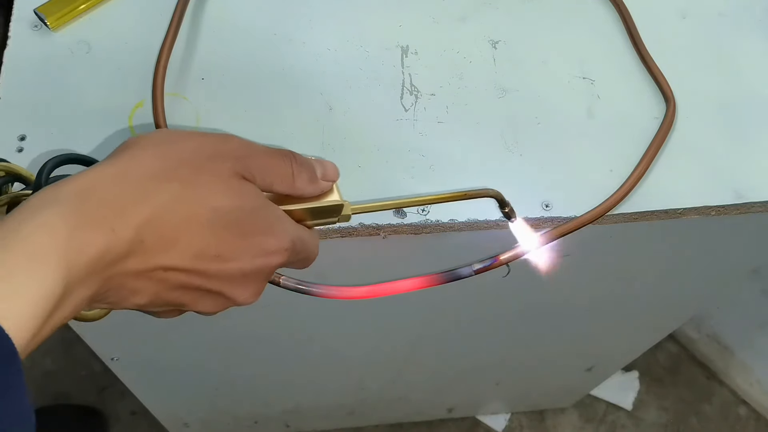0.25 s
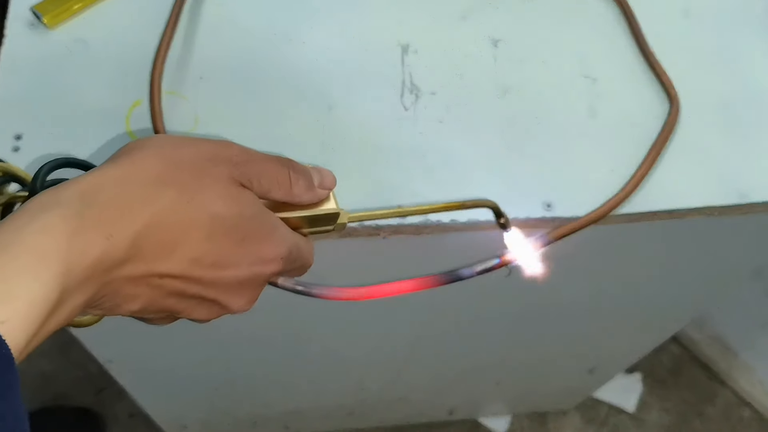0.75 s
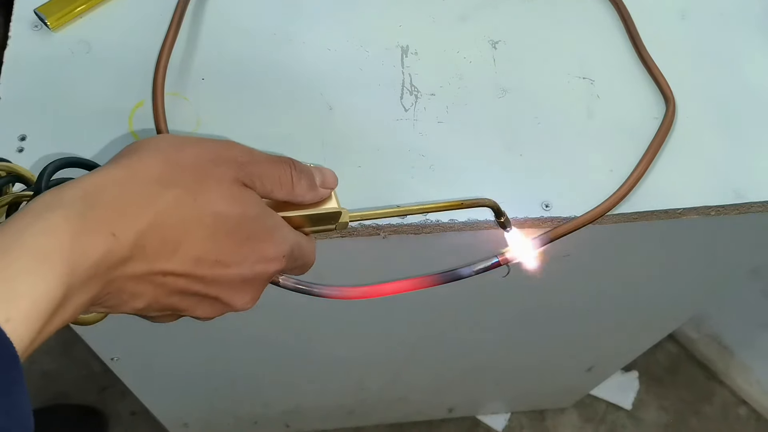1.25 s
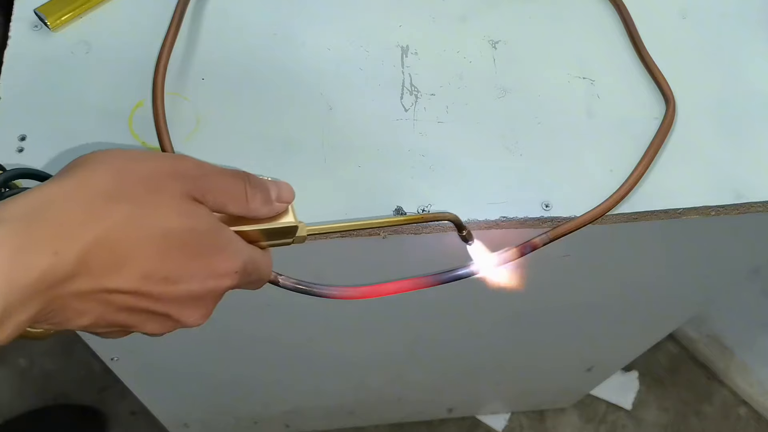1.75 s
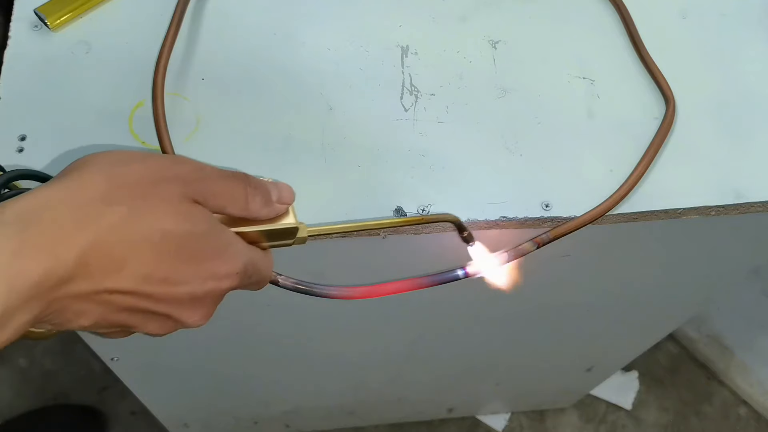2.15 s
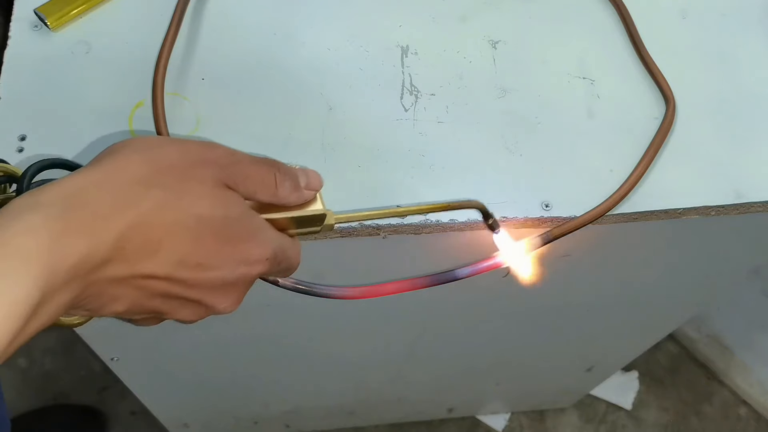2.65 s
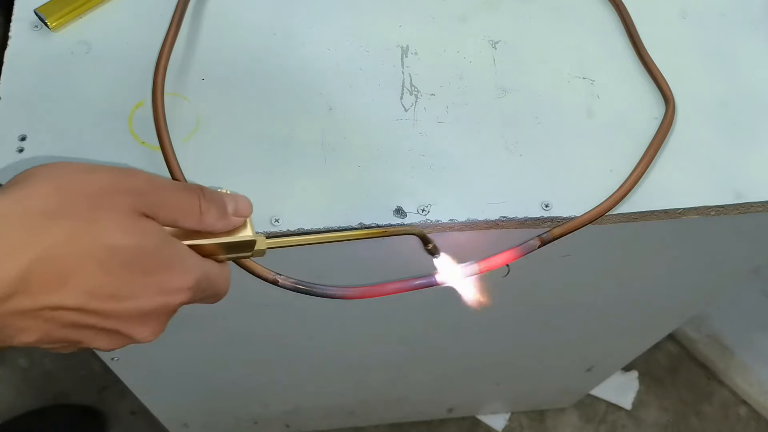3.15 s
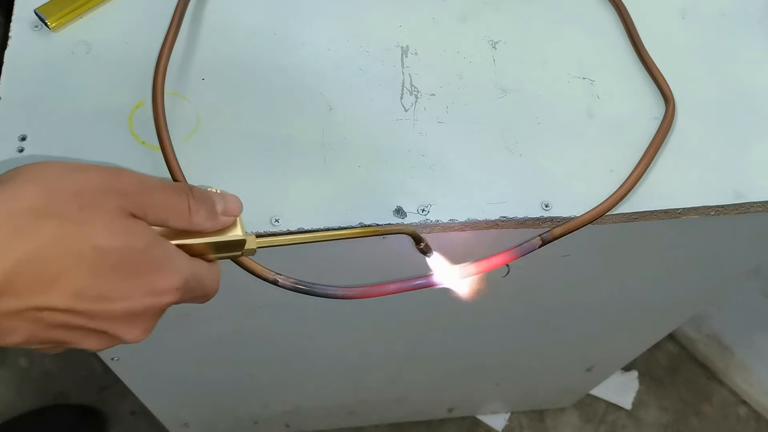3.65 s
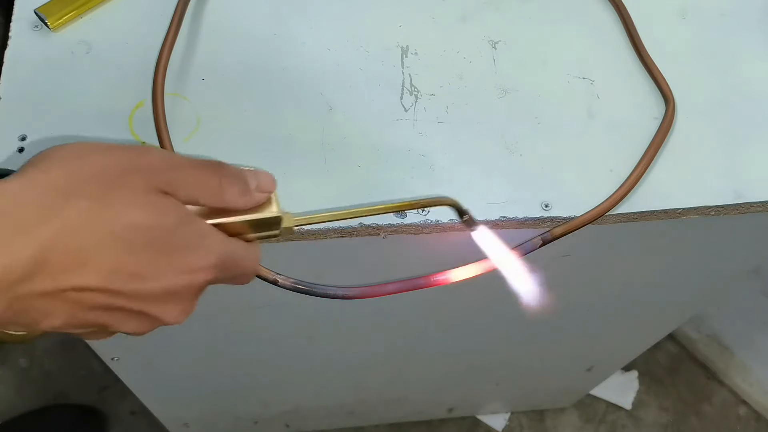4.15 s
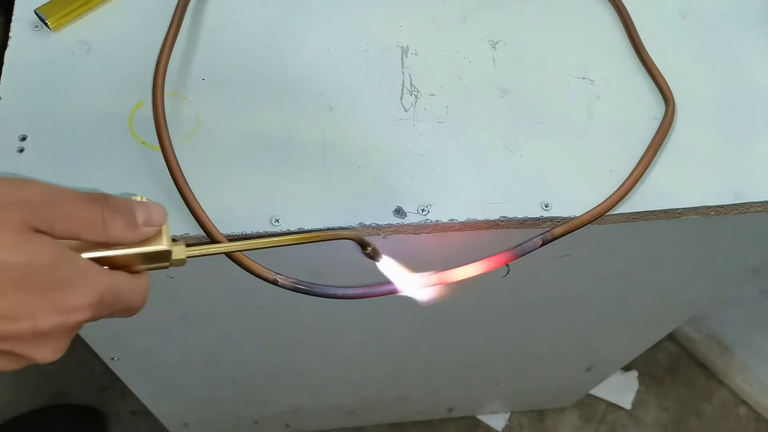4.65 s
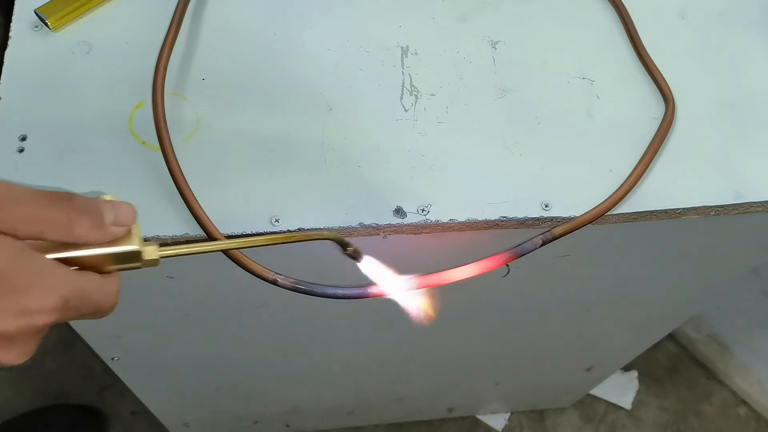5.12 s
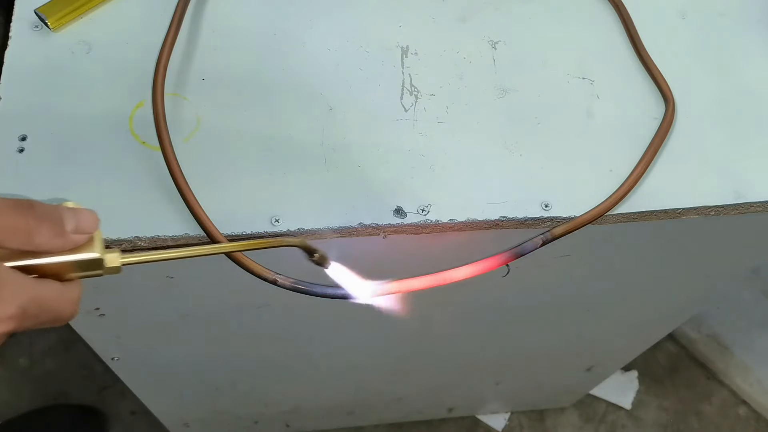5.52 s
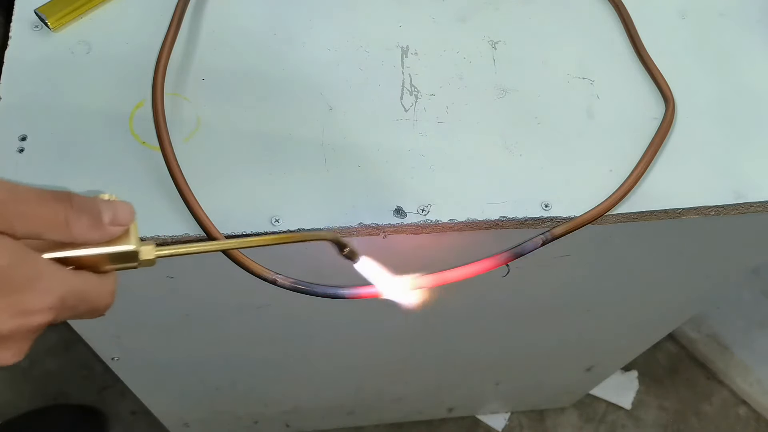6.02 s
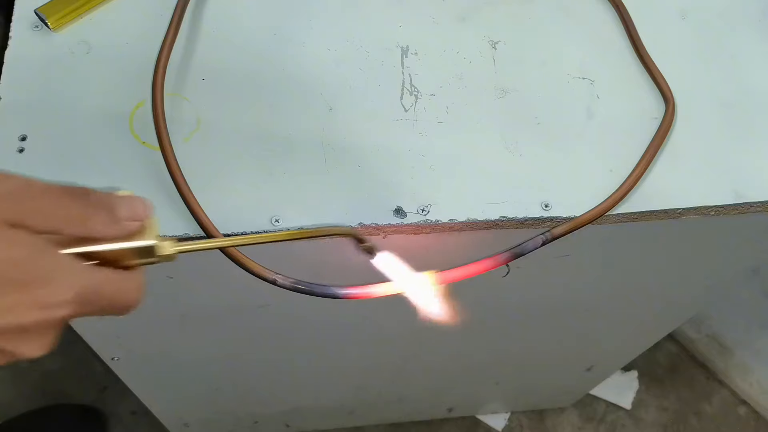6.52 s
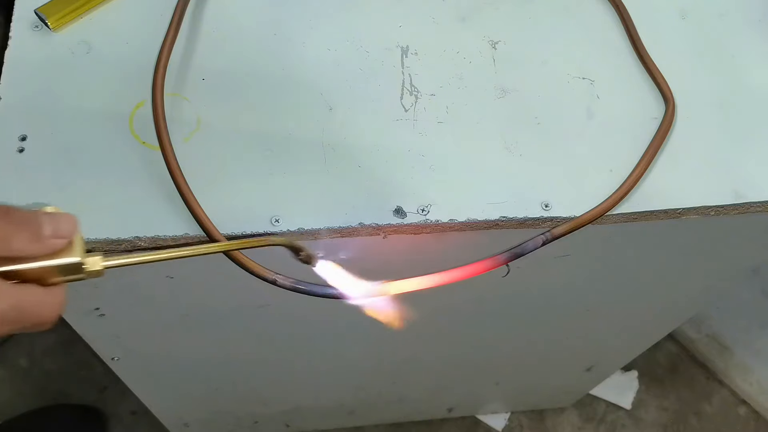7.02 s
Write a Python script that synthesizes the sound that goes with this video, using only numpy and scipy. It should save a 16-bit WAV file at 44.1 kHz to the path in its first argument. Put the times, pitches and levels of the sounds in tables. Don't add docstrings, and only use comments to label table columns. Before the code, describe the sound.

A hand-held gas torch hisses steadily and brightly against a metal pipe in a small hard room, with soft low flame surges.

```python
import sys
import numpy as np
from scipy import signal
from scipy.fft import rfft, irfft
from scipy.io import wavfile
from scipy.ndimage import uniform_filter1d

SR = 44100
rng = np.random.default_rng(int(sys.argv[2]) if len(sys.argv) > 2 else 0)


def unload_wav(signal):
    wavfile.write(
        sys.argv[1],
        SR,
        np.round(np.clip(np.atleast_2d(signal).T, -1, 1) * 32767).astype(np.int16),
    )


def volts_from_db(level):
    exponent = np.asarray(level, float) / 20
    return 10 ** exponent


N = 321048
SIZE, HOP = 1024, 256

# freq_hz, density_db
HISS_SPECTRUM = [(1400, -21), (2400, -16.5), (3050, -8), (3400, -2), (4200, -2), (5000, -0.5), (6300, -0.5),
                 (7600, -0.5), (8200, -2.5), (8700, -8.5), (10000, -21.5), (13000, -20)]
# freq_hz, density_db
SPLASH_SPECTRUM = [(300, -37), (600, -15.5), (1000, -13), (1500, -11), (2000, -2.5), (2600, 1), (3200, 1.5),
                   (3600, -17.5)]
# freq_hz, density_db
FIZZ_SPECTRUM = [(7600, -19), (8800, 0), (10000, 2.5), (11500, 3.5), (13000, 0), (14500, -0.5), (15500, 1),
                 (17000, -50.5)]
# freq_hz, density_db
ROAR_SPECTRUM = [(20, -20), (48, -9.5), (95, -20), (120, -8), (210, 0), (330, -3), (420, -4.5), (560, -8.5),
                 (800, -7.5), (1300, -12.5), (1800, -18)]
# freq_hz, density_db
BURN_SPECTRUM = [(15, -26), (40, -4.5), (95, -10), (130, -5.5), (210, -0.5), (400, -0.5), (520, -11.5),
                 (800, -2), (1200, -10.5), (2000, -38), (4000, -90)]
# hiss_db, splash_db, fizz_db, roar_db
LAYER_TRIM_DB = [0.96, 1.63, 2, 0.39]
# time_s, jet_level_db, turn_to_microphone_db, tip_db_per_octave
HAND = [(0, -25.5, -0.5, -1), (.4, -25, 0.5, 2), (.65, -24, 0, 0), (1.3, -23.5, -.5, 2),
        (1.55, -23.5, -1, 0), (1.72, -24.5, 2, 2), (2.05, -23.5, 1, -0.5), (2.3, -23.5, -1.5, -0.5),
        (2.68, -23.8, 0.5, 2.5), (2.95, -23, 0, -1), (3.45, -23, -1, 1), (3.9, -22, 0, -0.5),
        (4.35, -21.5, -0.5, 1.5), (4.8, -21.5, 1, 0), (5.5, -21.5, 1, 2), (6.3, -21, 0, -0.5),
        (6.7, -21, -0.5, 0), (7.05, -20.5, 1, 2.2)]
# start_s, length_s, roar_db
FLAME_SLIPS = [(0, 0.082, -45), (.24, .08, -46), (.37, .33, -41), (0.896, 0.66, -43), (1.78, .46, -51),
               (2.33, 0.26, -48.5), (2.7, 0.21, -39), (3.027, .2, -46), (3.196, 0.31, -39.5),
               (3.52, 0.19, -44), (3.796, 0.58, -37.5), (4.403, 0.13, -43), (4.595, 0.48, -42.5),
               (5.173, 0.29, -38), (5.62, 0.47, -44.5), (6.142, .3, -37.5), (6.506, .42, -36.5),
               (6.997, .4, -41.5)]
# time_s, right_port_lag_ms
PORT_LAG = [(0, -0.035), (1.36, -0.024), (1.6, -0.0018), (2.2, 0.0098), (2.45, -.02), (3.6, 0.023),
            (4.2, 0.014), (4.8, .06), (5.3, 0.044), (5.7, 0.094), (5.9, 0.046), (6.36, 0.11), (6.53, 0.067),
            (6.72, 0.016), (7.03, 0.095)]
# freq_hz, width_hz, lift_db
STANDING_WAVES = [
    [(2850, 500, -2.5), (3240, 60, 4.5), (3500, 400, 1.5), (3670, 120, 4.5), (3920, 70, 4),
     (4110, 120, 2.5), (4590, 120, 6.5), (5010, 90, 6.5), (5250, 60, 4.5), (5710, 60, 3), (6120, 60, 3),
     (6390, 60, 3), (6790, 84, 3.5), (7480, 60, 3.5), (7880, 60, 3)],
    [(2400, 120, 2.5), (2860, 90, 3), (4400, 120, 2.5), (5350, 120, 2.5), (5800, 150, 3), (6480, 100, 2.5),
     (7130, 80, 3), (7650, 100, 3), (8060, 60, 3)],
]
# left_delay_ms, right_delay_ms, left_db, right_db
NEAR_ECHOES = [(.73, .66, -13, -17), (1.68, 1.7, -17, -19), (2.38, 2.33, -16, -17), (4.52, 4.54, -12, -12),
               (7.3, 7.5, -19, -19), (8.0, 8.1, -19, -20)]
# freq_hz, share
DIRECT_SHARE = [(60, 0.77), (160, 0.97), (270, 0.98), (450, 0.69), (740, 0.87), (1200, 0.27), (2000, 0.64),
                (5000, 0.54), (7500, 0.54), (9500, 0.1), (15000, 0.16)]
# freq_hz, t60_s
ROOM_DECAY = [(200, 0.39), (2000, 0.19), (8000, 0.13), (15000, 0.069)]
# freq_hz, left_minus_right_db
PORT_BALANCE = [(60, 1.5), (160, 1.6), (270, 2.2), (450, .2), (1200, .8), (3300, .4), (5700, 1.9),
                (7200, 4.3), (8500, 5), (9300, -2.7), (11200, -3.3), (13000, -.9), (15000, .3)]
# freq_hz, threshold_db
LINE_THRESHOLD = [(1000, -16), (2000, -5.5), (3000, -4), (3600, -9), (8000, -9), (9000, -4), (11000, -5),
                  (13500, -3), (15000, -4)]

SPLASH_DB, FIZZ_DB, BURN_DB = -11.5, -7.5, -48.5
SPLASH_WANDER_DB, TILT_WANDER_DB_PER_OCTAVE, ROAR_WANDER_DB = .3, .3, .4
SLIP_RISE_S, SLIP_FALL_S, PINNED_DB = 0.1, 0.15, -52.5
FREE_DB, FREE_HISS_DB, FREE_SPLASH_DB = -34.5, 0.76, -.5
RING_DEPTH = 1.25
DIP_RIGHT_HZ, DIP_LEFT_HZ, DIP_WIDTH_HZ, DIP_DB = 700, 546, 146, -4.5
EARLY_SHARE = .45
SPLICE_S, FIRST_SPLICE_S, SEAM_HALF_S = 1103 / 44100, .0029, .0055
EDGE_HZ, TOP_HZ, TOP_LOST_SHARE = 15500, 15200, .25


def evened(x):
    return x / np.sqrt(np.mean(abs(x) ** 2) + 1e-20)


def read(points, hz):
    f, value = np.transpose(points)
    return np.interp(np.log(hz + 1), np.log(f + 1), value)


def wave(z):
    return signal.istft(z, nperseg=SIZE, noverlap=SIZE - HOP)[1][..., :N]


def drift(shape, bins, frames):
    field = uniform_filter1d(rng.standard_normal(shape), bins, 0)
    return evened(uniform_filter1d(field, frames, 1))


def wander(t):
    return drift((1, len(t)), 1, 14)[0]


def static(shape):
    noise = rng.standard_normal(shape) + 1j * rng.standard_normal(shape)
    return noise / np.std(wave(noise))


def layer_power(spectrum, level_db, hz):
    inside = (hz > .7 * spectrum[0][0]) & (hz < 1.3 * spectrum[-1][0])
    colour = evened(volts_from_db(read(spectrum, hz)) * inside)
    return (colour[:, None] * volts_from_db(level_db)) ** 2


def jet_power(hz, t, jet_db, turn_db):
    hiss_trim_db, splash_trim_db, fizz_trim_db, _ = LAYER_TRIM_DB
    free = roar_gain(t) / volts_from_db(FREE_DB)
    hiss_db = jet_db + FREE_HISS_DB * free
    splash_db = jet_db + SPLASH_DB + FREE_SPLASH_DB * free + SPLASH_WANDER_DB * wander(t)
    fizz_db = jet_db + FIZZ_DB + turn_db
    hiss = layer_power(HISS_SPECTRUM, hiss_db + hiss_trim_db, hz)
    splash = layer_power(SPLASH_SPECTRUM, splash_db + splash_trim_db, hz)
    fizz = layer_power(FIZZ_SPECTRUM, fizz_db + fizz_trim_db, hz)
    return hiss + splash + fizz


def roar_gain(t):
    start_s, length_s, level_db = np.transpose(FLAME_SLIPS)[..., None]
    rise = np.clip((t - start_s) / SLIP_RISE_S + .5, 0, 1)
    fall = np.clip((start_s + length_s - t) / SLIP_FALL_S + .5, 0, 1)
    gain = volts_from_db(level_db) * np.sin(np.pi / 2 * rise * fall) ** 2
    return np.sqrt((gain ** 2).sum(0) + volts_from_db(PINNED_DB) ** 2)


def burn_power(hz, t):
    roar_db = 20 * np.log10(roar_gain(t)) + ROAR_WANDER_DB * wander(t)
    roar = layer_power(ROAR_SPECTRUM, roar_db + LAYER_TRIM_DB[3], hz)
    steady = evened(volts_from_db(read(BURN_SPECTRUM, hz)))[:, None] * volts_from_db(BURN_DB)
    return roar + steady ** 2


def flame(hz, t):
    time_s, *hand = np.transpose(HAND)
    jet_db, turn_db, tip_db = (np.interp(t, time_s, column) for column in hand)
    power = jet_power(hz, t, jet_db, turn_db) + burn_power(hz, t)
    octaves = np.log2(np.clip(hz, 3300, 8200) / 5200) * ((hz > 3000) & (hz < 8600))
    tilt_db = np.outer(octaves, tip_db + TILT_WANDER_DB_PER_OCTAVE * wander(t))
    patches_db = drift(power.shape, 14, 9) + .4 * drift(power.shape, 120, 8)
    return np.sqrt(power) * volts_from_db(tilt_db + bench_db(hz, t) + patches_db)


def flutter():
    quick = evened(uniform_filter1d(rng.standard_normal(N), 160))
    spits = (rng.random(N) < 60. / SR) * np.minimum(rng.exponential(1, N), 2)
    bursts = signal.oaconvolve(spits, np.hanning(40), "same")
    return evened(volts_from_db(1.27 * quick) * (1 + 0.23 * bursts))


def bench_db(hz, t):
    leftness = np.clip(np.interp(t, *np.transpose(PORT_LAG)) / .05, 0, 1)
    right, left = (sum(db / (1 + (2 * (hz - f) / width) ** 2) for f, width, db in rings)
                   for rings in STANDING_WAVES)
    rings_db = np.outer(right, 1 - leftness) + np.outer(left, leftness)
    dip_hz = DIP_RIGHT_HZ + (DIP_LEFT_HZ - DIP_RIGHT_HZ) * leftness
    dip_db = DIP_DB / (1 + (2 * (hz[:, None] - dip_hz) / DIP_WIDTH_HZ) ** 2)
    return RING_DEPTH * rings_db + dip_db


def near_path(hz, t, size=8):
    slow = t[::size]
    lag_ms = np.interp(slow, *np.transpose(PORT_LAG))
    turn = np.exp(1j * np.pi * hz[:, None] * lag_ms / 1000)
    left_ms, right_ms, left_db, right_db = np.transpose(NEAR_ECHOES)
    stretch = 1 + .008 * drift((len(NEAR_ECHOES), len(slow)), 1, 19)
    small = (hz / np.hypot(hz, 1500))[:, None]
    paths = []
    for straight, delays_ms, levels_db in ((turn, left_ms, left_db), (1 / turn, right_ms, right_db)):
        echoes = 0
        for delay_ms, level_db, s in zip(delays_ms, levels_db, stretch):
            echoes = echoes + volts_from_db(level_db) * np.exp(-2j * np.pi * hz[:, None] * delay_ms * s / 1000)
        paths.append(evened(straight + small * echoes))
    return np.repeat(paths, size, axis=2)[..., :len(t)]


def room_tail():
    length = SR // 5
    taps = np.zeros((2, length))
    grid = np.arange(220, length - 20, 20)
    at = grid + rng.integers(0, 20, (2, len(grid)))
    np.put_along_axis(taps, at, rng.choice([-1., 1.], at.shape), 1)
    hz, t, z = signal.stft(taps, SR, nperseg=256)
    fade = volts_from_db(-60 * t / read(ROOM_DECAY, hz)[:, None])
    fade /= np.linalg.norm(fade, axis=1, keepdims=True)
    tail = signal.istft(z * fade, SR, nperseg=256)[1]
    return tail / np.linalg.norm(tail[0])


def room(x, count=5):
    out = 0
    where = np.arange(len(x)) / SR * 1.6 % count
    for k in range(count):
        away = abs((where - k + count / 2) % count - count / 2)
        turn = np.cos(np.pi / 2 * np.minimum(away, 1))
        out = out + signal.oaconvolve((x * turn)[None], room_tail(), axes=1)[:, :len(x)]
    return out


def scene():
    lead = SR // 5
    hz = np.fft.rfftfreq(SIZE, 1 / SR)
    t = np.arange(N // HOP + 5) * HOP / SR
    size = flame(hz, t)
    source = wave(size * static(size.shape)) * flutter()
    z = signal.stft(source, nperseg=SIZE, noverlap=SIZE - HOP)[2]
    share = np.clip(read(DIRECT_SHARE, hz), 0, 1)[:, None]
    near = wave(z * np.sqrt(share) * near_path(hz, t[:z.shape[1]]))
    far = wave(z * np.sqrt((1 - share) * EARLY_SHARE))
    lingering = uniform_filter1d(size, 9, 1, origin=4)
    wash_size = lingering * np.sqrt((1 - share) * (1 - EARLY_SHARE))
    wash = wave(wash_size * static((2, *size.shape)))
    return near + room(np.r_[far[lead:0:-1], far])[:, lead:] + wash


def splice(bass, treble):
    off_s = ((np.arange(N) / SR - FIRST_SPLICE_S) / SPLICE_S + .5) % 1 * SPLICE_S - SPLICE_S / 2
    seam = np.clip(1 - (off_s / SEAM_HALF_S) ** 2, 0, 1)
    return bass * volts_from_db(-2.8 * seam) + treble * volts_from_db(-1.4 * seam)


def thin(x):
    hz, t, z = signal.stft(x, SR, nperseg=2 * SIZE, noverlap=3 * SIZE // 2)
    power = uniform_filter1d(abs(z) ** 2, 3, 2)
    around = uniform_filter1d(uniform_filter1d(power, 24, 1), 30, 2)
    kept = power > around * volts_from_db(2 * read(LINE_THRESHOLD, hz))[:, None]
    mood = uniform_filter1d(rng.standard_normal(len(t)), 11)
    kept &= ~np.outer(hz > TOP_HZ, mood < np.quantile(mood, TOP_LOST_SHARE))
    kept &= (drift(z.shape[1:], 10, 5) < 2.55) | (hz < 2000)[:, None]
    return signal.istft(z * kept, SR, nperseg=2 * SIZE, noverlap=3 * SIZE // 2)[1][:, :N]


def top_cut(x):
    return signal.sosfilt(signal.butter(12, 16290, fs=SR, output="sos"), x)


def record(dry):
    hz = np.fft.rfftfreq(N, 1 / SR)
    balance = volts_from_db(np.outer([.5, -.5], read(PORT_BALANCE, hz)))
    band = (hz < EDGE_HZ) / (1 + (36 / (hz + 1)) ** 4)
    spectrum = rfft(dry) * balance * band
    bass = irfft(spectrum / (1 + (hz / 1800) ** 2), N)
    treble = irfft(spectrum, N) - bass
    mix = thin(splice(bass, treble))
    return top_cut(mix)


dry = scene()
out = record(dry)
unload_wav(out)
```